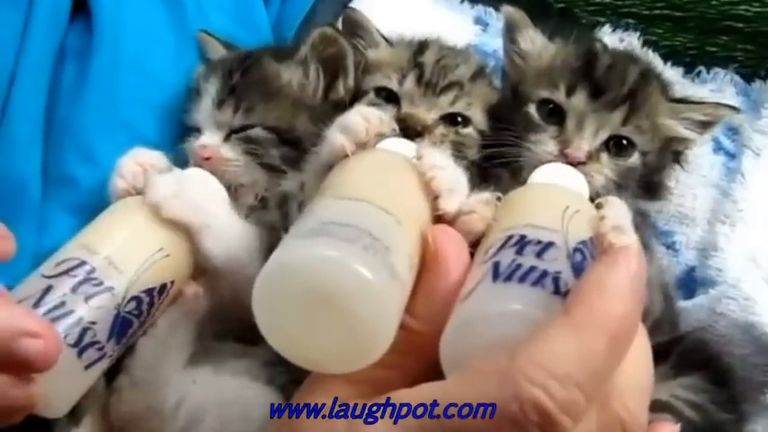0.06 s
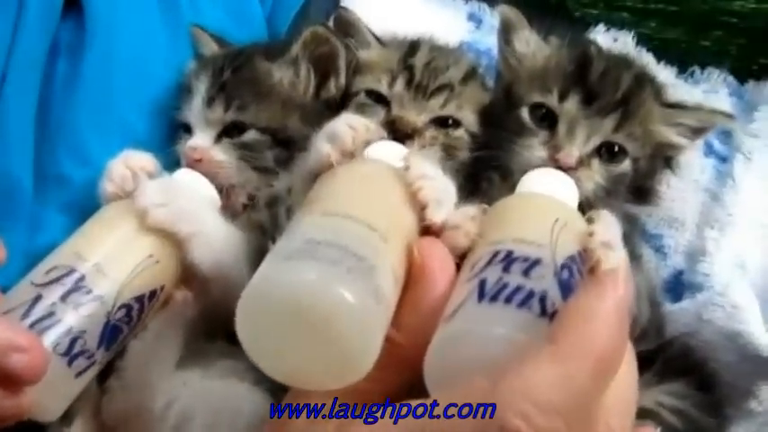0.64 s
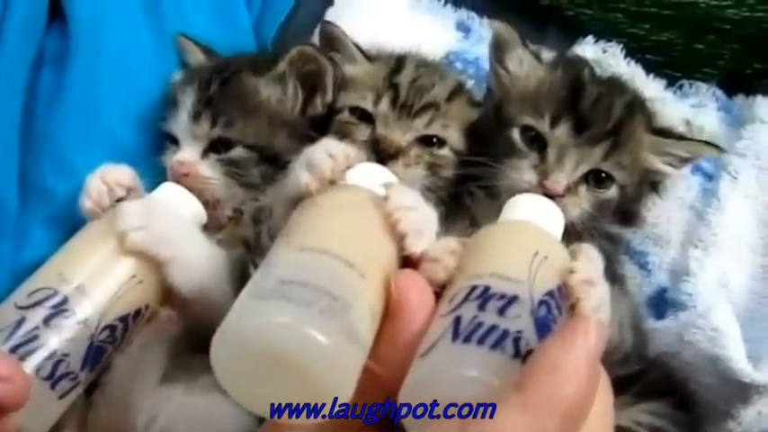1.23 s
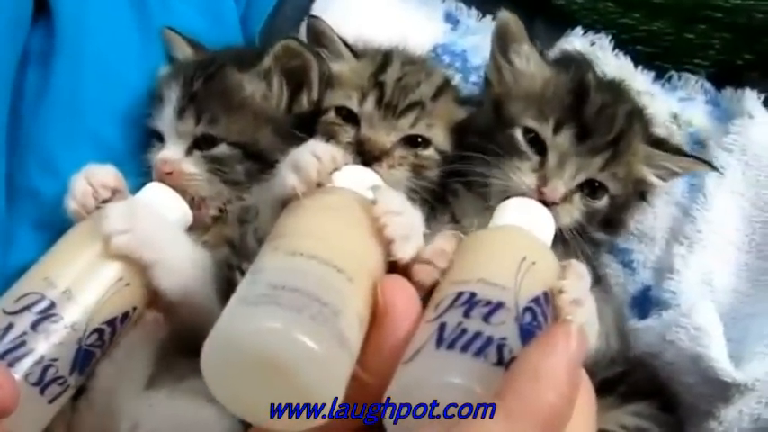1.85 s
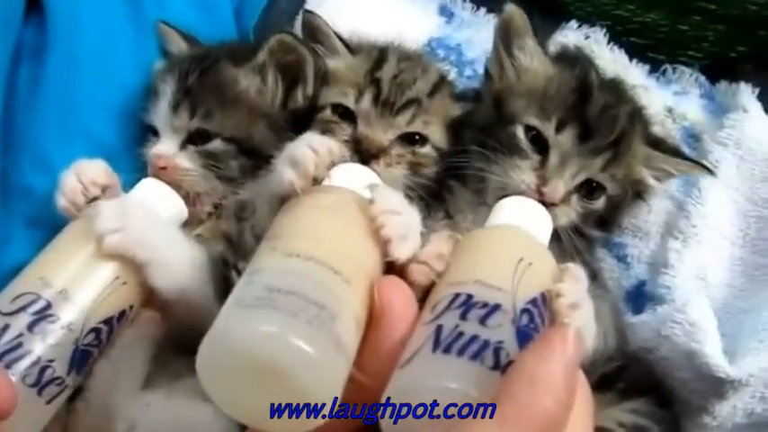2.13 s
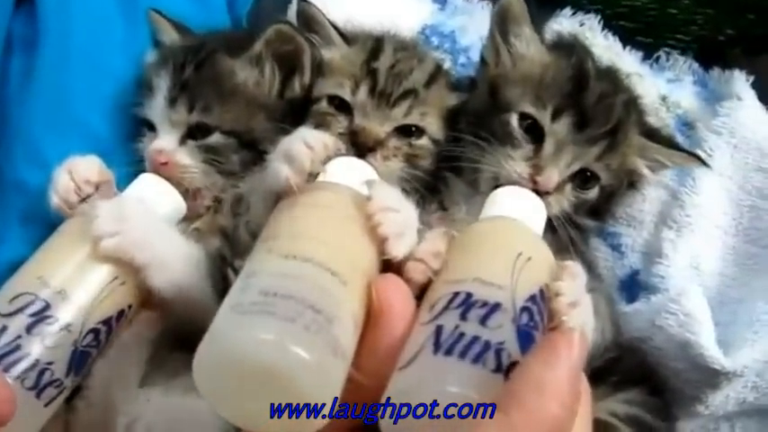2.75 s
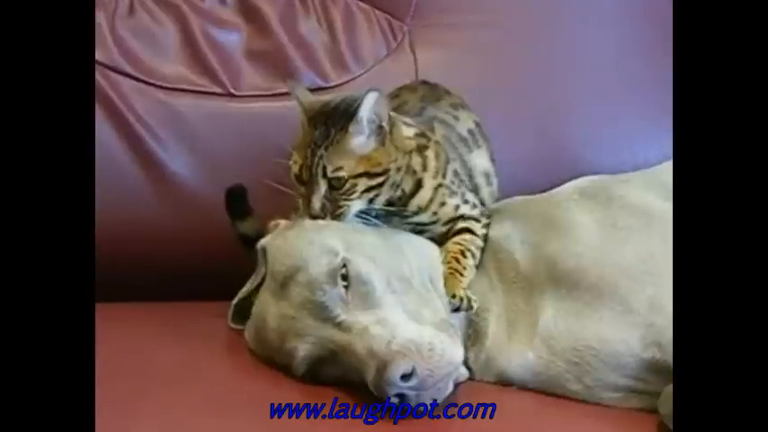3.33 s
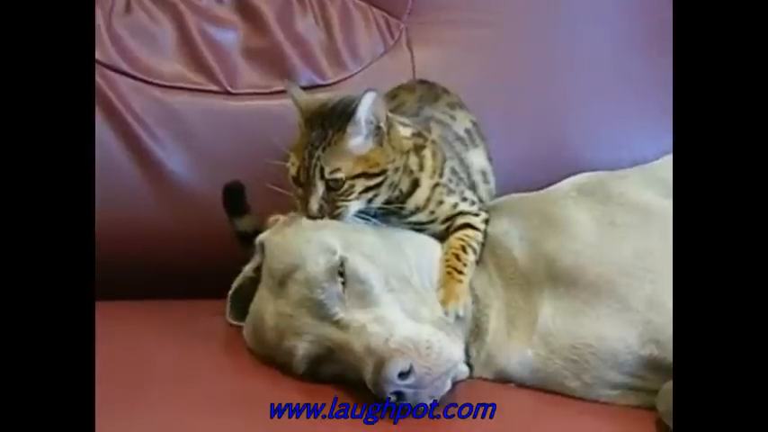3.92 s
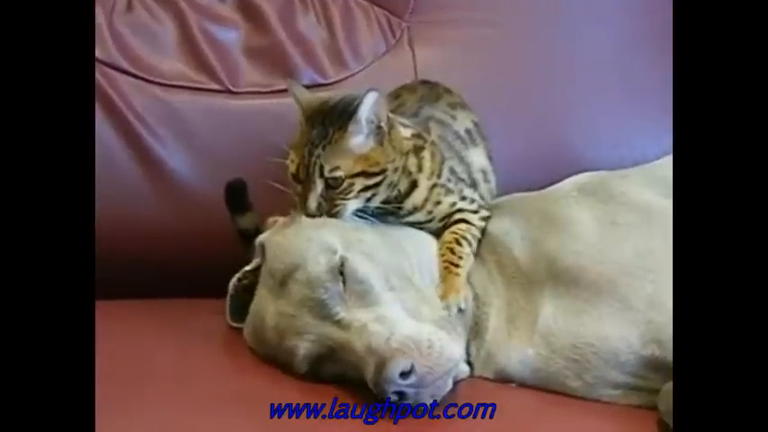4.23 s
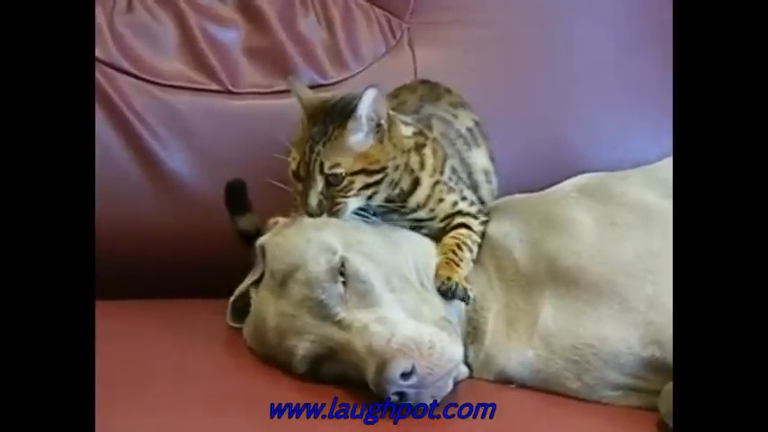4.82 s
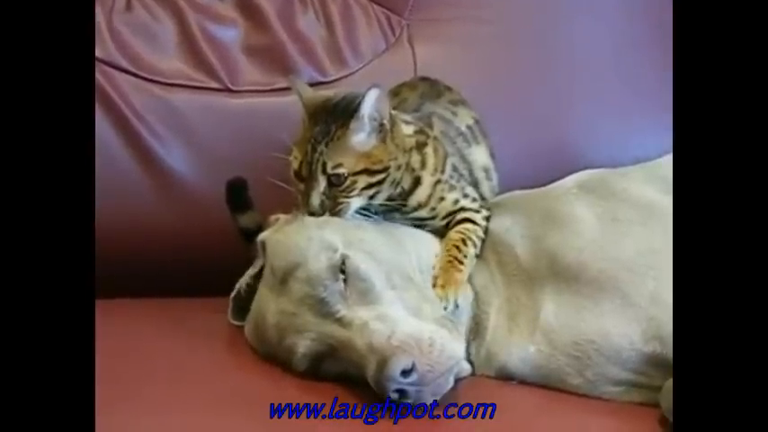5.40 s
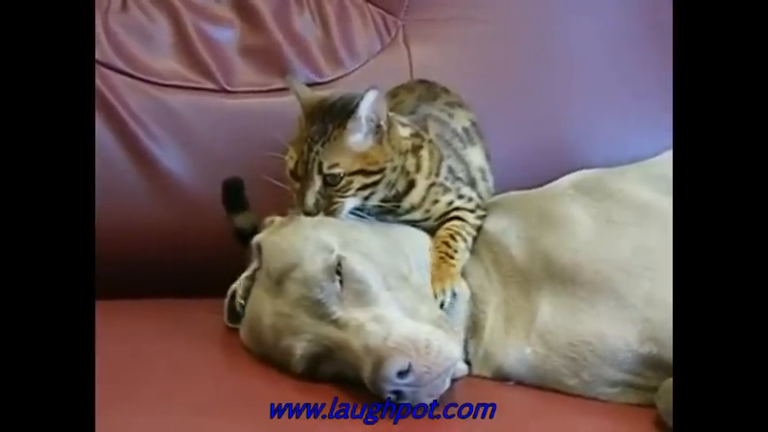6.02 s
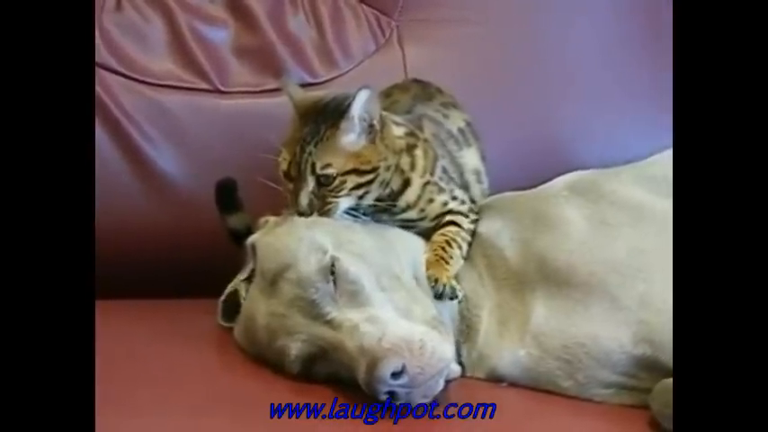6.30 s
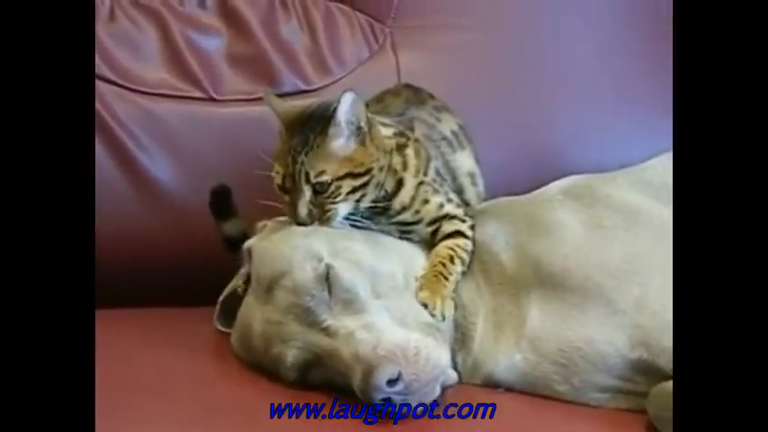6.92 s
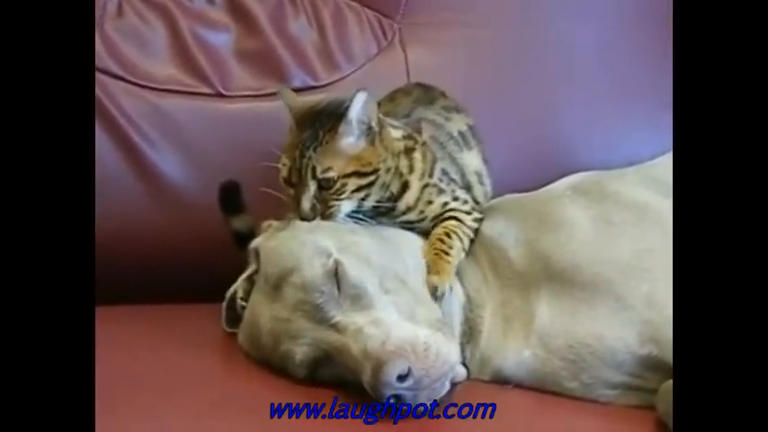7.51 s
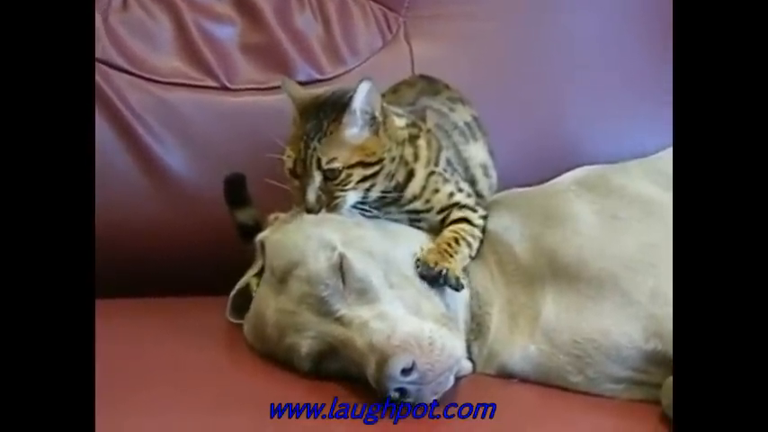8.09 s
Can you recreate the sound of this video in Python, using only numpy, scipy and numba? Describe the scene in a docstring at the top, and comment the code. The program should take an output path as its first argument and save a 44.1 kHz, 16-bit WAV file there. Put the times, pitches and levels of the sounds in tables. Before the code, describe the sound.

Small wet clicks of kittens bottle-feeding over low hum, followed by a cat's close, squeaky licking and nibbling on a dog's fur.

```python
"""A nursery, then a lounge. Three kittens suckle at bottles: parting lips click and ring their mouths,
milk squelches and plops, a rubber teat chirps, over low hum and hiss. After a short silence a cat grooms
a dog's head on a sofa, close and dull-topped: the barbed tongue rasps through fur, sticks and squeaks;
wet smacks and a run of quick nibbles ring in the small room; the bodies rub and bump the cushions."""
import sys
import numpy as np
from scipy import signal
from scipy.fft import rfft, irfft, next_fast_len
from scipy.io import wavfile
from numba import njit

SR = 44100
rng = np.random.default_rng(int(sys.argv[2]) if len(sys.argv) > 2 else 0)


def persist_wave(psi):
    """Save psi, clipped to +-1, as 16-bit WAV."""
    counts = np.round(np.clip(psi, -1, 1) * 32767).astype(np.int16)
    wavfile.write(sys.argv[1], SR, np.atleast_2d(counts).T)


N = 359415
T = np.arange(N) / SR
KITTENS_END_S, CAT_START_S = 2.705, 2.853

# suckling clicks (time [s], peak [dB], mouth resonance [Hz], tick re ring [dB])
SUCKS = [(0.0616, -33.5, 2010, -5), (0.0867, -37, 1250, -5), (0.1429, -36, 1350, 2),
         (0.213, -25.5, 2960, -2.5), (0.226, -28.5, 1280, -0.5), (0.247, -26.5, 2020, -2),
         (0.427, -38, 2000, -2), (0.4612, -26, 1450, -2), (0.4751, -29, 2450, -3), (0.735, -32.5, 1050, -5),
         (0.7765, -34, 1160, 0), (0.811, -24, 2070, -4), (0.8472, -26.5, 2290, -2),
         (1.0807, -28, 1970, 4.5), (1.1158, -34, 1200, 1.5), (1.2683, -33, 1190, 2), (1.294, -34, 1270, 0),
         (1.3644, -32, 1710, -1), (1.427, -35, 1980, 0), (1.506, -27, 1690, -14), (1.5186, -28.5, 1150, -1),
         (1.546, -33, 2290, -12), (1.6165, -34, 1190, -1.5), (1.795, -34, 1250, -2),
         (1.81, -34.5, 1250, -2), (1.87, -29.5, 2100, 1), (2.0165, -28, 1600, -5), (2.097, -34, 2230, -6),
         (2.1162, -28, 1720, -4), (2.132, -33.5, 1900, -2), (2.175, -34, 1610, -2), (2.2027, -37, 1320, 2),
         (2.291, -29.5, 1850, 0), (2.362, -34, 1230, 0), (2.467, -28, 1950, 0.5),
         (2.497, -27.5, 1420, -1.5)]
# milk in a teat (start [s], length [s], level [dB], resonance [Hz])
SQUELCHES = [(0.136, 0.013, -52, 2400), (0.575, 0.021, -38.5, 1430), (0.85, 0.013, -51, 2080),
             (0.857, 0.18, -59.5, 3600), (1.093, 0.056, -57, 3000), (1.263, 0.012, -54, 2440),
             (1.366, 0.03, -57, 4030), (1.37, 0.02, -50, 2040), (1.701, 0.19, -59.5, 2350),
             (2.19, 0.061, -61, 3670), (2.432, 0.018, -43, 1150)]
# milk bubbles (time [s], peak [dB], pitch [Hz])
PLOPS = [(.2262, -30, 5850), (.4753, -34, 6160), (0.735, -32, 465), (.776, -37, 540), (0.809, -22, 6000),
         (.8475, -38, 500), (.852, -34, 520), (1.5195, -32, 500)]
# air entering a teat (start [s], length [s], level [dB], pitch [Hz])
TEAT_CHIRP = (2.425, .026, -40, 820)
# tongue strokes (start [s], length [s], level [dB], mouth resonance [Hz])
STROKES = [(2.845, 0.62, -32, 1413), (3.059, 0.15, -28.5, 2115), (3.338, 0.19, -39, 2114),
           (3.549, 0.036, -48, 653), (3.993, 0.21, -41, 1950), (4.169, 0.44, -35, 1624),
           (4.271, 0.11, -30.5, 1410), (4.375, 0.24, -30, 2250), (4.664, 0.061, -27, 1614),
           (4.79, 0.11, -34, 1406), (4.979, 0.5, -39.5, 1530), (5.48, 0.13, -31.5, 1606),
           (5.649, .07, -29, 2400), (5.839, 0.14, -32.5, 2075), (6.344, 0.39, -40.5, 1910),
           (7.055, 0.057, -29.5, 1620), (7.114, 0.053, -32, 1038), (7.461, 0.48, -42, 1504),
           (7.689, 0.2, -38.5, 1483), (7.843, 0.069, -31.5, 1040), (7.953, .05, -30.5, 1863),
           (8.055, 0.049, -30.5, 1413)]
# bodies on cushions (start [s], length [s], level [dB])
RUBS = [(2.868, 0.083, -42), (3.008, 0.44, -39), (3.511, 0.056, -35), (4.118, 0.063, -38.5),
        (4.323, 0.47, -40), (4.714, 0.19, -37), (5.02, 0.14, -42), (5.494, 0.092, -41.5)]
# tongue on damp fur (start [s], length [s], level [dB], from [Hz], to [Hz], Q)
SQUEAKS = [(4.286, 0.1, -37, 1310, 1255, 2.5), (4.493, 0.092, -32, 2180, 2100, 1.9),
           (5.521, 0.058, -34.5, 1700, 1200, 1.4), (5.6, 0.027, -27, 2430, 2200, 3.5),
           (5.653, 0.09, -28, 1200, 1470, 3.1), (5.706, 0.052, -25.5, 2400, 2570, 5.1),
           (7.078, 0.07, -30.5, 824, 637, 1.8), (7.367, 0.072, -37, 2080, 1990, 4.7),
           (7.861, 0.068, -33, 750, 690, 1.3), (8.086, 0.14, -23, 950, 1230, 1.1)]
# tonal squeaks (start [s], length [s], level [dB], from [Hz], to [Hz])
WHISTLES = [(3.775, .07, -43, 1590, 1740), (4.331, .05, -25.5, 1260, 1290),
            (4.345, .145, -33.5, 2570, 2480), (4.51, .1, -33, 2190, 2120), (5.51, .045, -38, 700, 690),
            (5.73, .07, -37.5, 2920, 2960)]
# tongue smacks, tooth ticks (time [s], level [dB], tilt [dB/oct])
SMACKS = [(3.0712, -29, 3), (3.0933, -38, -1), (3.1237, -31, 4.5), (3.135, -40, -1), (3.2502, -33, 0.5),
          (3.28, -32, 1.5), (3.7521, -39.5, -3), (3.917, -47.5, 1.5), (3.984, -48.5, 0), (5.1227, -29, 2.5),
          (5.336, -28.5, 2.5), (5.8742, -29, 3), (6.172, -30, 2.5), (6.3245, -31.5, 1.5),
          (7.028, -36.5, 2.5), (7.3203, -39, -1), (7.365, -37.5, 0)]
NIBBLES = [(6.4887, -33, 2), (6.5532, -34, 1.8), (6.595, -33.5, 1), (6.6234, -34.5, 0.5), (6.6478, -38, 0),
           (6.672, -35.5, -0.5), (6.6972, -33.5, 0), (6.7174, -37, 3), (6.7459, -36, 2.5),
           (6.7665, -36, -0.5), (6.7873, -34.5, 1), (6.8224, -34.5, 1), (6.843, -35.5, 0),
           (6.8695, -35.5, .5), (6.8944, -34, .5), (6.9166, -39, -1), (6.95, -34, .5), (6.9749, -34.5, .5),
           (7.0066, -34, 0.5)]
# soft tongue clicks (time [s], level [dB], mouth resonance [Hz], Q)
SLURPS = [(5.4985, -36.5, 1870, 2.2), (5.593, -37.5, 2100, 3.1), (5.61, -49, 2380, 2.8),
          (5.657, -37.5, 1730, 2.3), (5.672, -38.5, 1970, 2.6), (7.3209, -41, 2120, 6),
          (7.365, -41.5, 2090, 4.3)]
# static nibble resonances (centre [Hz], width [Hz], gain [dB])
NIBBLE_MODES = [(339, 17, -6.5), (595, 30, 1), (764, 16, 1.5), (1158, 23, -1.5), (1456, 70, 1),
                (1640, 21, -7.5), (1847, 23, 1), (2310, 26, -0.5), (3627, 21, -2), (4580, 100, 0)]
# cat's mouth while nibbling (time [s], resonance [Hz])
JAW_PATH = [(6.49, 2950), (6.62, 2900), (6.7, 3320), (6.8, 3120), (6.92, 3120), (6.98, 3000), (7.03, 2690)]
# saliva bubbles (time [s], peak [dB], pitch [Hz], half length [s])
POPS = [(2.9405, -19, 1800, .0005), (2.941, -19, 4200, .0006), (4.704, -6.5, 2850, .0005),
        (5.7048, -10, 2650, .0006), (5.7066, -4.8, 2600, .0008)]
# thuds on the sofa, head nudges into the seat (time [s], level [dB])
BUMPS = [(3.129, -26.5), (3.271, -29), (3.76, -22), (3.781, -39), (4.452, -31), (4.857, -37),
         (7.886, -40.5), (7.945, -43), (8.102, -33.5)]
NUDGES = [(5.337, -22), (5.876, -19.5), (6.173, -23.5), (6.49, -24), (7.029, -25)]
# weight sinking into the cushion (start [s], length [s], peak [dB], pitch [Hz])
THROBS = [(4.343, 0.047, -37, 106), (4.745, 0.041, -32, 101), (4.852, .026, -36, 126)]
# seat resonances (frequency [Hz], gain [dB])
SEAT_MODES = [(140, -17.5), (202, -9.5), (234, -5.5), (283, -19), (337, -7.5)]
# steady tones (frequency [Hz], base level [dB]); the last nursery row is a thin whine
NURSERY_TONES = [(59.2, -56), (86.1, -70.5), (204.6, -64.5), (8802, -72.5)]
LOUNGE_TONES = [(50, -57.5), (108, -60), (233, -59)]
# nursery hum envelope (time [s], gain [dB])
HUM_SWELL = [(0, 9.5), (.3, 12), (.7, 7.5), (.9, 2), (1.3, 5), (1.7, 9.5), (2.1, 12), (2.7, 12)]
# wall and furniture reflections (delay [s], gain before wet mix [dB])
ECHOES = [(.012, -9), (.021, -9), (.0275, -9), (.0335, -8.5), (.0385, -8), (.0435, -11), (.0495, -9),
          (.058, -14), (.091, -13), (.119, -18)]
# source and background spectra (frequency [Hz], relative density [dB])
TICK_SPECTRUM = [(150, -20), (500, 4), (1200, 5.5), (2200, 7.5), (4500, 2), (8000, -18), (15000, -10)]
FUR_SPECTRUM = [(90, -22), (200, -10.5), (500, 0.5), (1250, -5), (1550, -5), (2500, -4), (3400, -6.5),
                (4250, -14), (5400, -28.5)]
SMACK_SPECTRUM = [(100, -27.5), (200, -11), (330, -2), (600, -1.5), (1050, -6.5), (1650, -4.5),
                  (2050, -0.5), (2350, -2), (2750, 0), (3450, -1), (3800, -9), (4150, -16), (4700, -16),
                  (5400, -33)]
NIBBLE_SPECTRUM = [(100, -25.5), (200, -15.5), (320, -5), (560, -6), (760, -3), (1050, -8.5), (1400, -5),
                   (2300, -5.5), (2750, -0.5), (3350, -3.5), (3700, -5.5), (4150, -17), (4650, -14),
                   (5300, -29)]
CUSHION_SPECTRUM = [(35, -19), (65, -9), (85, -5), (115, -1.5), (160, -7), (230, -2), (400, -7.5),
                    (700, -11.5), (1500, -48.5)]
BUMP_SPECTRUM = [(60, -31.5), (140, 1.5), (280, 9), (450, -1), (800, -28.5), (1600, -9.5), (4000, -48)]
NURSERY_SPECTRUM = [(25, -2.5), (60, 0), (105, -0.5), (140, 1.5), (230, 4), (320, -6.5), (500, -13.5),
                    (750, -12), (1050, -24), (2000, -24.5), (4000, -52), (7000, -48), (11000, -33.5),
                    (15000, -53)]
HISS_SPECTRUM = [(500, 10), (3000, 4.5), (7000, -2.5), (11000, -9), (15000, -11.5)]
LOUNGE_SPECTRUM = [(25, -6.5), (55, -11.5), (80, -3), (120, -7.5), (165, -9), (240, -4), (570, -8.5),
                   (1070, -10.5), (1800, -9), (3370, -17.5), (4500, -19), (5500, -29)]


def suckling(size=8192, mouth_t60_s=0.004, glide_per_s=15, upper_ratio=2.11, upper_db=-17.5):
    """Parting lips tick and ring two rising mouth resonances; milk squelches; faint wet fizz between."""
    out = np.zeros(N)
    for (s, db, hz, tick_db), (decay, shape) in zip(SUCKS, rng.standard_normal((len(SUCKS), 2))):
        phase = 2 * np.pi * hz * T[:size] * (1 + glide_per_s * T[:size])
        upper = undb(upper_db) * np.sin(phase * upper_ratio * 2 ** (0.17 * shape))
        ring = unit((np.sin(phase) + upper) * fade(mouth_t60_s * 2 ** (.5 * decay), size))
        tick = colour(snap(0.0087, size), TICK_SPECTRUM, tilt_db_oct=tick_db)  # harder is brighter
        click = ring + undb(tick_db) * tick
        add(out, s, undb(db) * click / np.abs(click).max())
    for s, length_s, db, hz in SQUELCHES:
        squelch = formant(rng.standard_normal(size), hz, q=1.1)
        envelope = np.sqrt(np.sin(np.pi * ramp(length_s, size)).clip(0))
        add(out, s, undb(db) * squelch * envelope)
    droplets = grains(per_s=220, spread_db=2.2)
    fizz = colour(droplets, TICK_SPECTRUM, tilt_db_oct=-4.5) * undb(-60.5 + 3.5 * walk(9.23))
    return room(out + fizz, t60_s=0.06, wet_db=-11)


def plopping(size=2048, t60_cycles=8.7, pitch_rise=0.18):
    """Milk bubbles burst in a kitten's mouth; each rings a few cycles, rising in pitch."""
    out = np.zeros(N)
    for s, db, hz in PLOPS:
        cycles = hz * T[:size]
        ring = np.sin(2 * np.pi * cycles * (1 + pitch_rise / 2 * cycles / t60_cycles))
        add(out, s, undb(db) * ring * fade(t60_cycles / hz, size))
    return out


def chirping(size=2048, pitch_rise=0.24):
    """Air slips in and the rubber teat flutters: a short rising tone with weak overtones."""
    s, length_s, db, hz = TEAT_CHIRP
    along = ramp(length_s, size)
    phase = 2 * np.pi * np.cumsum(hz * (1 + pitch_rise * (along - .5))) / SR
    tone = sum(np.sin(k * phase) * undb(-11 * (k - 1)) for k in (1, 2, 3))
    out = np.zeros(N)
    add(out, s, undb(db) * unit(tone) * np.sin(np.pi * along))
    return out


def licking():
    """Tongue barbs flick hairs in dense grains, shaped by the moving mouth."""
    mouth_path = [(s + length_s / 2, hz) for s, length_s, _, hz in STROKES]
    hairs = colour(grains(per_s=5000, spread_db=2.1), FUR_SPECTRUM)
    mouth = unit(resonate(hairs, curve(mouth_path), 1.0))
    pressure = swells(STROKES, attack_s=0.024, release_s=0.096, rest_db=-60.5)
    return unit(hairs + undb(-3) * mouth) * pressure * undb(0.69 * walk(45))


def squeaking(size=8192):
    """The tongue sticks on damp fur; uneven slips drive a gliding mouth resonance."""
    out = np.zeros(N)
    for s, length_s, db, from_hz, to_hz, q in SQUEAKS:
        along = ramp(length_s, size)
        hz = from_hz + (to_hz - from_hz) * along
        slips = rng.standard_normal(size) * undb(4.8 * walk(220)[:size])
        add(out, s, undb(db) * formant(slips, hz, q) * np.sin(np.pi * along))
    return room(out, t60_s=0.59, wet_db=-3.5)


def whistling(size=8192, waver=0.012):
    """Slips fall into step: a thin, wavering tone."""
    out = np.zeros(N)
    for s, length_s, db, from_hz, to_hz in WHISTLES:
        along = ramp(length_s, size)
        hz = (from_hz + (to_hz - from_hz) * along) * (1 + waver * walk(400)[:size])
        phase = 2 * np.pi * np.cumsum(hz) / SR
        tone = unit(np.sin(phase) * undb(3 * walk(130)[:size]))
        add(out, s, undb(db) * tone * np.sqrt(np.sin(np.pi * along).clip(0)))
    return room(out, t60_s=0.35, wet_db=-10)


def smacking(size=16384):
    """The tongue tears free in a burst of a few milliseconds."""
    out = np.zeros(N)
    for s, db, tilt_db_oct in SMACKS:
        burst = snap(0.008, size, hold_s=0.0026)
        add(out, s, undb(db) * colour(burst, SMACK_SPECTRUM, tilt_db_oct))
    return walls(out, wet_db=-1.2)


def slurping(size=16384):
    """Softer tongue clicks ring the mouth."""
    out = np.zeros(N)
    for s, db, hz, q in SLURPS:
        click = snap(0.0064, size, hold_s=0.0016)
        add(out, s, undb(db) * formant(click, hz, q))
    return walls(out, wet_db=-4)


def nibbling(size=16384, common_gain=0.71, jaw_q=14.0, jaw_db=-4.5):
    """Teeth snap through fur; the similar ticks ring static resonances and the moving mouth."""
    ticks = np.zeros(N)
    common = common_gain * snap(0.0078, size, hold_s=0.0019)
    for s, db, tilt_db_oct in NIBBLES:
        tick = common + snap(0.0092, size, hold_s=0.0021)
        add(ticks, s, undb(db) * colour(tick, NIBBLE_SPECTRUM, tilt_db_oct))
    rings = sum(undb(db) * resonate(ticks, np.full(N, float(hz)), hz / width_hz)
                for hz, width_hz, db in NIBBLE_MODES)
    mouth = undb(jaw_db) * resonate(ticks, curve(JAW_PATH), jaw_q)
    return walls(undb(-1) * (ticks + rings + mouth), wet_db=-4.6)


def popping(size=512):
    """Saliva bubbles swell and burst in a few cycles."""
    out = np.zeros(N)
    t = T[:size] - T[size // 2]
    for s, db, hz, half_s in POPS:
        add(out, s + t[0], undb(db) * np.cos(2 * np.pi * hz * t) * np.exp(-(t / half_s) ** 2))
    return room(out, t60_s=0.39, wet_db=-9)


def bumping(size=16384, nudge_s=0.0014):
    """Paws or shoulders thud and ring the seat; weight throbs in the cushion; nudges push it briefly."""
    out = np.zeros(N)
    ring = sum(undb(db) * np.sin(2 * np.pi * hz * T[:size]) for hz, db in SEAT_MODES) * fade(0.46, size)
    for s, db in BUMPS:
        thud = undb(-3.5) * colour(rng.standard_normal(size), BUMP_SPECTRUM) * fade(0.36, size)
        add(out, s, undb(db) * (ring + thud))
    for s, length_s, db, hz in THROBS:
        envelope = np.sin(np.pi * ramp(length_s, size))
        add(out, s, undb(db) * np.sin(2 * np.pi * hz * T[:size]) * envelope)
    for s, db in NUDGES:
        add(out, s, undb(db) * np.sin(np.pi * ramp(nudge_s, size)))
    return out


def rubbing():
    """Shifting bodies rub the cushions: low, grainy friction."""
    friction = colour(grains(per_s=1200, spread_db=2.8), CUSHION_SPECTRUM)
    pressure = swells(RUBS, attack_s=0.026, release_s=0.07, rest_db=-56.5)
    return friction * pressure * undb(0.5 * walk(25))


def nursery():
    """Swelling hum, thin whine, low murmur of air and hiss; stereo."""
    drone = hum(NURSERY_TONES[:-1], drift_rad=0.09, drift_hz=3.5) * undb(curve(HUM_SWELL))
    whine_hz, whine_db = NURSERY_TONES[-1]
    whine = undb(whine_db) * np.sin(2 * np.pi * whine_hz * T + 1.1 * walk(70))
    air = noise(NURSERY_SPECTRUM) * undb(-45 + walk(8.95))
    side = noise(NURSERY_SPECTRUM) * undb(-56.5)
    hiss = np.array([noise(HISS_SPECTRUM) for _ in range(2)]) * undb(-54)
    return drone + whine + air + np.outer([1, -1], side) + hiss


def lounge():
    """Steady room noise and weak hum."""
    air = noise(LOUNGE_SPECTRUM) * undb(-41 + walk(5.9))
    return air + hum(LOUNGE_TONES, drift_rad=0.5, drift_hz=6)


def hum(tones, drift_rad, drift_hz):
    """Sines with drifting phase; levels are rms."""
    return sum(undb(db) * np.sqrt(2) * np.sin(2 * np.pi * hz * T + drift_rad * walk(drift_hz))
               for hz, db in tones)


def room(x, t60_s, wet_db, size=32768):
    """Direct sound plus a dense tail of reflections."""
    tail = rng.standard_normal(size) * fade(t60_s, size)
    tail *= undb(wet_db) / np.linalg.norm(tail)
    return x + signal.fftconvolve(x, tail)[:N]


def walls(x, wet_db, t60_s=0.54, diffuse_db=9.5, size=32768):
    """Lounge response: direct sound, separate echoes, diffuse tail; unit energy."""
    response = rng.standard_normal(size) * fade(t60_s, size)
    response *= undb(diffuse_db) / np.linalg.norm(response)
    for delay_s, db in ECHOES:
        response[int(delay_s * SR)] += undb(db)
    response *= undb(wet_db)
    response[0] += 1
    return signal.fftconvolve(x, response / np.linalg.norm(response))[:N]


def snap(t60_s, size, hold_s=0):
    """Tight cluster of micro-clicks with an even spectrum."""
    index = np.arange(size)
    envelope = fade(t60_s, size)[np.maximum(index - int(hold_s * SR), 0)]
    spectrum = rfft(rng.standard_normal(size) * envelope)
    flattened = spectrum / (np.abs(spectrum) + 0.43 * np.abs(spectrum).mean())
    return irfft(flattened, size) * (index < size // 2)


def grains(per_s, spread_db):
    """Random impulses of uneven size."""
    impulses = (rng.random(N) < per_s / SR) * rng.choice([-1, 1], N)
    return impulses * undb(spread_db * np.minimum(rng.exponential(size=N), 4))


def noise(spectrum):
    """Coloured noise; rms 1."""
    return colour(rng.standard_normal(N), spectrum)


def colour(x, spectrum, tilt_db_oct=0):
    """Minimum-phase filter through a tilted spectrum; rms 1."""
    size = next_fast_len(len(x), True)
    octave = np.log2(np.maximum(np.fft.rfftfreq(4096, 1 / SR), 10))
    hz, db = np.transpose(spectrum)
    gain_db = np.interp(octave, np.log2(hz), db) + tilt_db_oct * octave
    cepstrum = irfft(np.log(undb(gain_db)))
    half = len(cepstrum) // 2
    causal = np.r_[0, 2 * cepstrum[1:half]]
    response = irfft(np.exp(rfft(causal, 2 * half)))
    return unit(irfft(rfft(x, size) * rfft(response, size), size)[:len(x)])


def formant(x, hz, q):
    """Two equal band-passes in series; rms 1."""
    centre_hz = hz * np.ones(len(x))
    return unit(resonate(resonate(x, centre_hz, float(q)), centre_hz, float(q)))


@njit
def resonate(x, hz, q):
    """State-variable band-pass, centre set per sample."""
    y = np.empty(len(x))
    band_state, low_state = 0., 0.
    for i in range(len(x)):
        g = np.tan(np.pi * min(hz[i], .4 * SR) / SR)
        band = (band_state + g * (x[i] - low_state)) / (1 + g * (g + 1 / q))
        band_state = 2 * band - band_state
        low_state += 2 * g * band
        y[i] = band / q
    return y


def swells(moves, attack_s, release_s, rest_db):
    """Gain of movements that rise, hold and decay, floored at light resting contact."""
    gain = np.full(N, undb(rest_db))
    for s, length_s, db, *_ in moves:
        rise = np.clip((T - s) / attack_s, 0, 1)
        fall = np.exp(-np.maximum(T - s - length_s, 0) / release_s)
        gain = np.maximum(gain, undb(db) * rise * fall)
    return gain


def walk(rate_hz):
    """Smooth random drift, spread near 1."""
    knots = rng.standard_normal(2000)
    return np.interp(T * rate_hz, np.arange(len(knots)), knots)


def curve(points):
    """Line through (time [s], value) points."""
    return np.interp(T, *np.transpose(points))


def ramp(length_s, size):
    """0 to 1, then held."""
    return np.minimum(T[:size] / length_s, 1)


def fade(t60_s, size):
    """Exponential decay."""
    return np.exp(-np.log(1000) * T[:size] / t60_s)


def add(track, s, sound):
    """Mix in at time s."""
    i = max(int(s * SR), 0)
    track[i:i + len(sound)] += sound[:max(N - i, 0)]


def unit(x):
    """Scale to rms 1."""
    return x / np.sqrt(np.mean(x ** 2) + 1e-20)


def undb(db):
    """Decibels to gain."""
    return 10 ** (np.asarray(db) / 20)


def scene():
    """Kittens in stereo with a treble notch; brief silence; cat in narrow-band mono."""
    balance_db = [[.45], [-.45]]
    kittens = (suckling() + plopping() + chirping() + nursery()) * undb(balance_db)
    friction = room(licking() + rubbing(), t60_s=0.12, wet_db=-5.5)
    mouth = squeaking() + whistling() + smacking() + slurping() + nibbling() + popping()
    cat = friction + mouth + bumping() + lounge()
    notch = signal.butter(6, (7850, 8700), "bandstop", fs=SR, output="sos")
    lowpass = signal.ellip(7, .3, 44, 5550, fs=SR, output="sos")
    kittens = signal.sosfilt(notch, kittens * (T < KITTENS_END_S))
    cat = signal.sosfilt(lowpass, cat * (T > CAT_START_S))
    return kittens + cat


def record(dry):
    """Low-pass at 15.2 kHz: the highest hiss is cut off."""
    return signal.sosfilt(signal.ellip(8, .2, 70, 15200, fs=SR, output="sos"), dry)


dry = scene()
out = record(dry)
persist_wave(out)
```